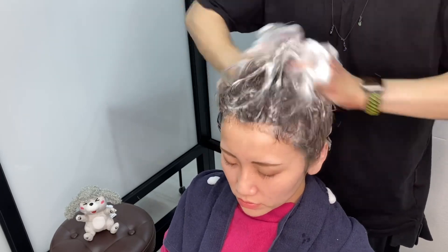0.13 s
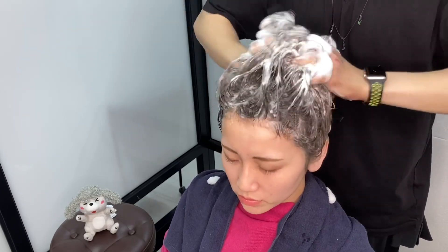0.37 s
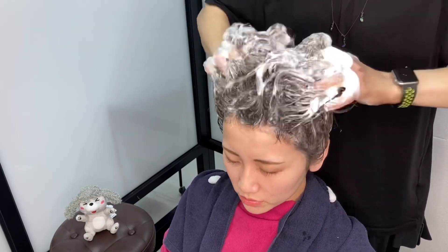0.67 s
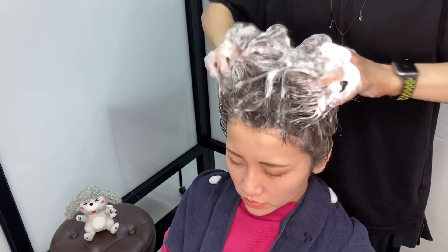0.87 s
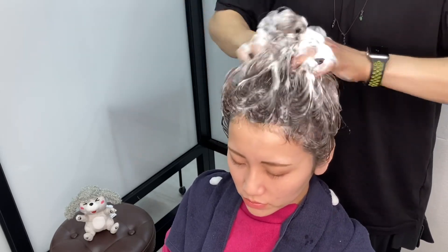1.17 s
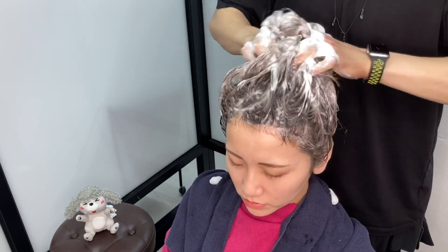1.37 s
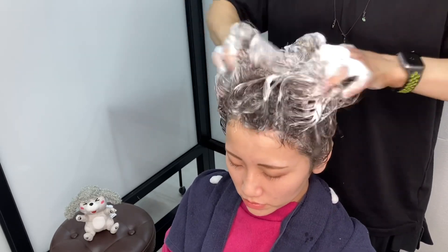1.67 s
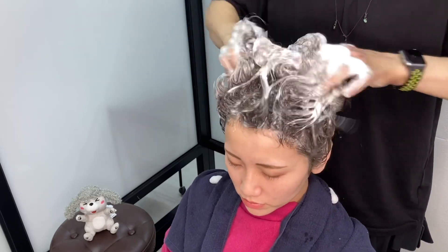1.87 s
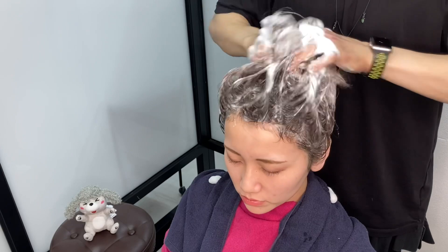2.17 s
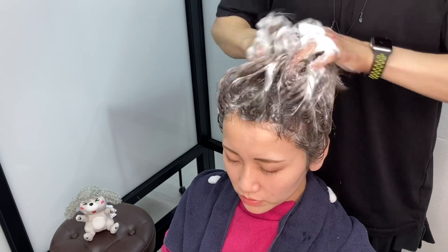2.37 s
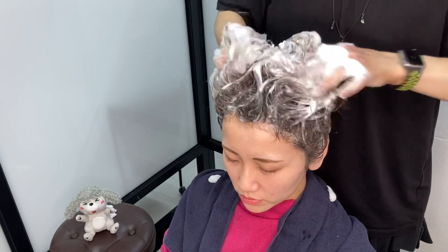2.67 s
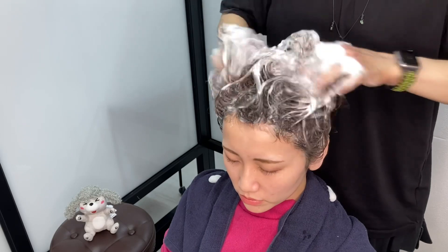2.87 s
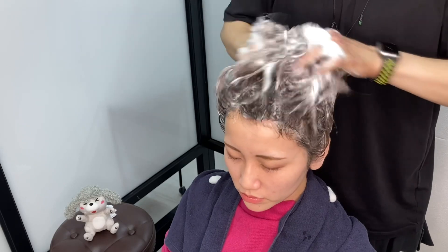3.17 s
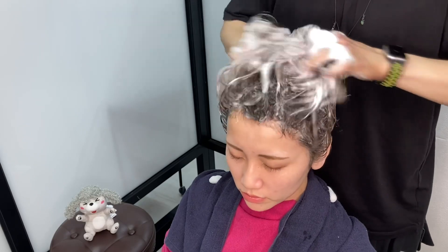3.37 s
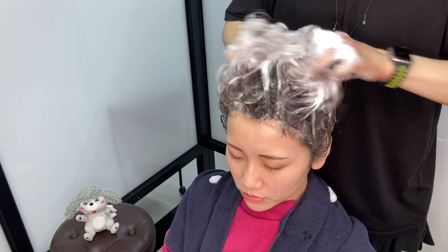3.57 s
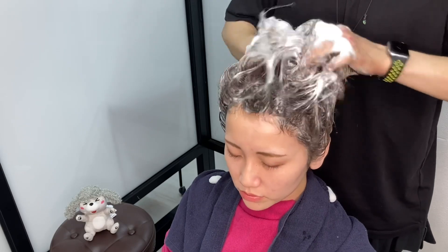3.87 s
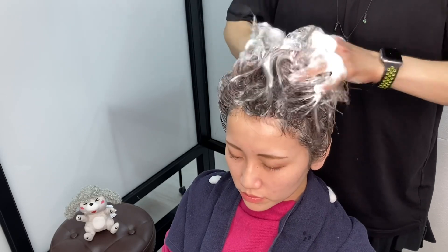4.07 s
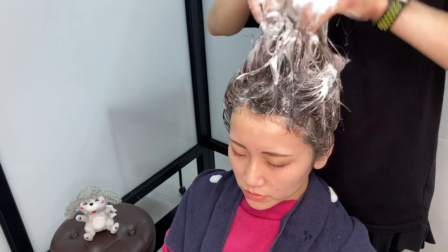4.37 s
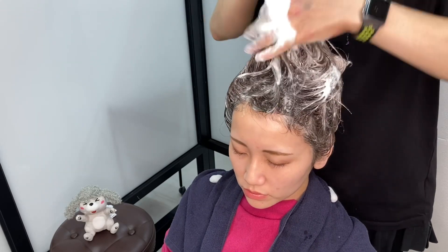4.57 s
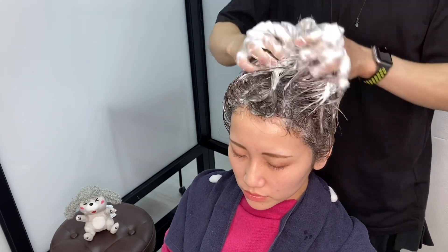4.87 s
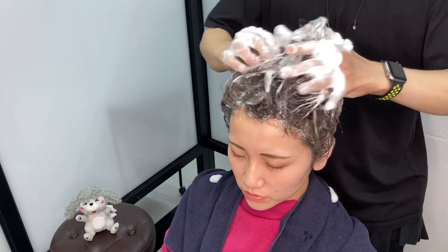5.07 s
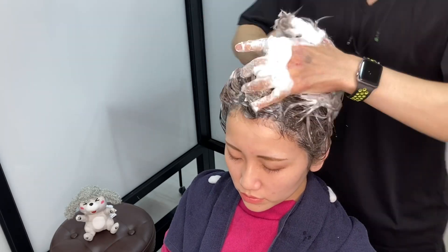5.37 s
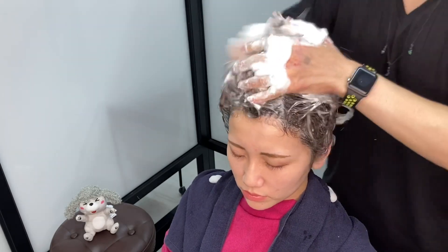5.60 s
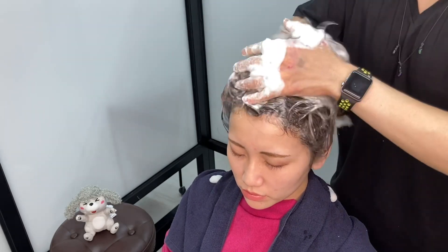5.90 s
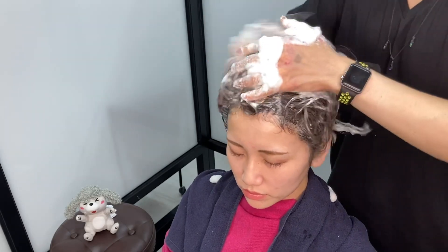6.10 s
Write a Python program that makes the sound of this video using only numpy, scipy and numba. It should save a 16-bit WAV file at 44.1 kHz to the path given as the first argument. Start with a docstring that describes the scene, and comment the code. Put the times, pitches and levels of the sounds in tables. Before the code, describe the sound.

Close, rapid wet scrubbing of foamy hair with crackling bubbles and squelches, a brief near-quiet gap, then gentler, rounder kneading in a small room.

```python
"""Fingers rub a thickly lathered scalp about ten times a second: wet slosh, squish and fine fizz from clouds of bubbles.
Air pockets squelch, foam spurts, wet skin pops and soap films snap along the way, all built from short dying sines.
After about four seconds the rubbing pauses as the hair is gathered; strands tick and palms knead a wetter patch.
Soon the hands scrub on more softly, and the foam turns rounder as a whole palm settles on it.
Filtered noise and a faint hum make the small salon's ventilation throughout; a phone close by takes it in."""
import sys
import numpy as np
from scipy import signal
from scipy.fft import rfft, irfft
from scipy.io import wavfile
from scipy.ndimage import uniform_filter1d
from numba import njit

SR = 44100
rng = np.random.default_rng(int(sys.argv[2]) if len(sys.argv) > 2 else 0)


def bounce(signal):
    """Save signal as a 16-bit WAV file at the path given by the first command-line argument."""
    frames = np.transpose(np.atleast_2d(signal))
    limited = np.clip(frames, -1, 1)
    pcm = np.round(limited * 32767).astype(np.int16)
    wavfile.write(sys.argv[1], SR, pcm)


N = 275184
TIME = np.arange(N) / SR  # seconds
FREQ = np.maximum(np.arange(N // 2 + 1) * SR / N, 1)  # Hz, kept above zero for logarithms


def undb(db):
    """Turn decibels into gain."""
    return 10 ** (np.asarray(db) / 20)


def unit(x):
    """Scale to an average strength (rms) of 1."""
    return x / np.sqrt(np.mean(x ** 2))


def colour(x, points):
    """Filter by (Hz, dB) points joined on a log-frequency axis."""
    hz, db = np.transpose(points)
    gain = undb(np.interp(np.log(FREQ), np.log(hz), db))
    return irfft(rfft(x) * gain, N)


def curve(table):
    """Join (time, level) points with straight lines, at every moment."""
    return np.interp(TIME, *np.transpose(table))


def walk(rate):
    """Wander smoothly at random, changing about rate times a second; spread 1."""
    spectrum = rfft(rng.standard_normal(N))
    return unit(irfft(spectrum * np.exp(-(FREQ / rate) ** 2), N))


@njit
def ring(start, hz, cycles, size, glide):
    """Each bubble is a dying sine whose pitch climbs; size (bubbles, 2) is the root of its energy left and right."""
    out = np.zeros((2, N))
    for k in range(len(start)):
        life = cycles[k] * SR / hz[k]  # samples
        first = int(start[k] * SR)
        phase = 0.
        strength = np.sqrt(12 / life)  # short and long bubbles get equal energy
        fade = np.exp(-3 / life)
        for i in range(max(first, 0), min(first + int(2 * life) + 2, N)):
            phase += 2 * np.pi * hz[k] / SR * (1 + glide * (i - first) / life)
            strength *= fade
            value = strength * np.sin(phase)
            out[0, i] += value * size[k, 0]
            out[1, i] += value * size[k, 1]
    return out


def bubbles(start, hz, cycles, size, glide, spread=1.0):
    """Bubbles burst or form (either sign), scattered left and right over the head."""
    sign = rng.choice([-1, 1], len(start))
    side = rng.uniform(-1, 1, len(start))
    balance = 1 + spread * np.outer(side, [1, -1])
    sizes = (sign * size)[:, None] * balance
    return ring(start, np.minimum(hz, .4 * SR), np.maximum(cycles, .5), sizes, float(glide))


def scrubbing(slosh_db=-5.5, fizz_db=0.58, ticks_db=-6):
    """Each rub stirs three sizes of bubble above their simmer; the larger ones come in clumps as the hair slips."""
    place, crest, rub_squish_db, rub_fizz_db, gap_hz = current_rub()
    calm_squish, calm_fizz, calm_slosh = undb(simmer())

    # the gap's resonance glides down 0.15 octaves over one rub
    gliding_gap_hz = gap_hz * 2 ** (-0.15 * (place - .5))
    slosh = cloud(low_hz=349, high_hz=1310, cycles=3.9, scatter_db=1.76, glide=0.05,
                  gap_db=3, gap_hz=gap_hz / 2.23, wander_octaves=0.48, count=8000)
    squish = cloud(low_hz=1286, high_hz=3245, cycles=7.1, scatter_db=0.0, glide=0.085,
                   gap_db=3.5, gap_hz=gliding_gap_hz, wander_octaves=0.18, count=9000, gap_octaves=0.26)
    fizz = cloud(low_hz=3100, high_hz=14940, cycles=3.15, scatter_db=0.0, glide=0.0085,
                 gap_db=6.0, gap_hz=6760, wander_octaves=0.52, count=70000)
    # sticky strands tear through the squish with short, sparse ticks
    ticks = cloud(low_hz=900, high_hz=4460, cycles=1.55, scatter_db=2.5, glide=0.03,
                  gap_db=5.0, gap_hz=gap_hz, wander_octaves=0.4, count=1100)
    squish = unit(squish + undb(ticks_db) * ticks)

    slosh_rub = finger_speed(place, crest, grip=0.81, ease=2.0) * undb(rub_squish_db + slosh_db)
    squish_rub = finger_speed(place, crest, grip=1.0, ease=2.8) * undb(rub_squish_db)
    fizz_rub = finger_speed(place, crest=0.37, grip=0.58, ease=1.11) * undb(rub_fizz_db + fizz_db)
    # the energy of the rub adds to that of the simmer
    slosh = slosh * np.hypot(calm_slosh, slosh_rub)
    squish = squish * np.hypot(calm_squish, squish_rub)
    fizz = fizz * np.hypot(calm_fizz, fizz_rub)

    clumps = slips(depth=0.39, decay_s=0.0071, count=380)
    # the wet middle of the sound leans to the left
    wet = slosh + squish * undb([[1.1], [-1.1]])
    return clumps * wet + clumps ** 0.11 * fizz


# rubs of the fingers: start_s, crest (share of the rub, 0-1), squish_db and fizz_db (relative levels),
# gap_hz (resonance of the gap under the fingers)
RUBS = [(-0.001, 0.4, -55.5, -51.5, 2210), (0.109, 0.5, -52.5, -49.5, 2640), (0.199, 0.25, -53, -53, 1820),
        (0.309, 0.37, -58.5, -51.5, 2890), (0.404, 0.4, -58.5, -54, 2320), (0.509, 0.46, -54, -51, 2440),
        (0.603, 0.4, -54.5, -49.5, 2720), (0.701, 0.55, -55, -53.0, 2540),
        (0.805, 0.33, -52.5, -51.5, 2300), (0.909, 0.5, -55, -54.5, 2390), (1.002, 0.05, -51, -52, 1870),
        (1.107, 0.7, -53, -52.5, 2280), (1.196, 0.3, -54.5, -51.5, 2330), (1.299, 0.47, -54.5, -52.5, 2120),
        (1.404, 0.1, -52, -50.5, 1770), (1.498, 0.4, -53.5, -51.5, 2750), (1.597, 0.3, -52, -50.5, 2120),
        (1.694, 0.5, -51.5, -51, 1800), (1.789, 0.23, -51.5, -52, 1800), (1.888, 0.75, -55, -52.5, 2400),
        (1.992, 0, -52.5, -49, 2270), (2.089, 0.85, -56, -51.5, 2150), (2.191, 0.2, -50, -50.5, 1760),
        (2.297, 0.5, -55, -52, 2230), (2.394, 0.07, -51, -49.5, 2100), (2.499, 0.72, -53.5, -51.5, 1450),
        (2.594, 0.1, -53.5, -49.0, 1930), (2.69, 0.76, -54.5, -49, 2400), (2.787, 0.1, -53, -49.5, 2220),
        (2.891, 0.6, -60, -50.5, 2110), (2.98, 0.15, -52, -51, 2010), (3.083, 0.29, -58.5, -49, 2930),
        (3.167, 0.1, -50.5, -51.5, 2000), (3.27, 1, -59, -49.5, 2100), (3.354, 0.1, -52.5, -50.5, 2230),
        (3.461, 0.23, -55, -50, 1960), (3.543, 0.16, -52.5, -51.5, 1790), (3.644, 0.76, -58, -53, 1630),
        (3.721, 0.6, -60, -54, 2230), (3.823, 0.3, -60, -56.5, 1950), (3.919, 0.6, -60.5, -56, 2700),
        (4.003, 0.4, -60, -56, 1620), (4.108, 0.1, -65, -65.5, 2170), (4.315, 0.4, -65.5, -72, 2180),
        (4.759, 0.2, -71, -61.5, 2210), (4.856, 0.3, -61, -77, 2200), (4.926, 0.9, -61, -64.5, 1630),
        (5.024, 0.3, -59, -61, 2740), (5.124, 0.3, -59, -65, 1700), (5.207, 0.43, -56.5, -60, 2150),
        (5.322, 0.28, -57.5, -60.0, 2530), (5.402, 0.2, -58, -55.5, 1870), (5.493, 0.4, -58, -57.5, 2270),
        (5.578, 0.25, -57, -58, 1900), (5.668, 0.35, -59, -55.5, 2240), (5.753, 0.35, -58, -58, 2130),
        (5.832, 0.55, -57, -59.5, 1660), (5.925, 0.15, -54.5, -61, 1740), (5.995, 0.4, -57, -62.5, 1990),
        (6.084, 0.35, -55.5, -55.5, 2010), (6.154, 0.45, -58, -57.5, 2220)]


def current_rub(longest_s=0.111):
    """Place within the current rub (0-1) and that rub's crest, levels and resonance at every moment."""
    start, *columns = np.transpose(RUBS)
    length = np.minimum(np.diff(start, append=np.inf), longest_s)
    rub = np.maximum(np.searchsorted(start, TIME) - 1, 0)
    place = np.clip((TIME - start[rub]) / length[rub], 0, 1)
    return [place] + [column[rub] for column in columns]


def finger_speed(place, crest, grip, ease):
    """In each rub the fingers break loose, reach a crest of 1 and ease off to a stall."""
    top = np.clip(crest, .1, .9)  # leaves time to rise and to fall
    turn = np.minimum(place / top, (1 - place) / (1 - top)) * np.pi / 2
    return np.sin(turn) ** np.where(place < top, grip, ease)


# foam that keeps working between the rubs, fainter as the hair is gathered, then a wetter patch:
# time_s, squish_db, fizz_db, slosh_db (relative levels)
FOAM_SIMMER = [(0, -64, -57.5, -61), (.6, -63, -59.5, -63.5), (1.0, -56.5, -57, -67),
               (1.35, -64.5, -59.5, -64), (2, -61.5, -63, -60), (3.4, -63, -68, -61.5),
               (4.05, -66.5, -62, -63), (4.2, -66.5, -66, -64), (4.43, -67.5, -64.5, -61.5),
               (4.52, -66.5, -71.5, -61), (4.66, -69, -65, -66), (4.745, -76, -72, -67),
               (4.8, -63, -69, -69), (4.98, -68, -65, -58.5), (5.2, -66, -65.5, -62.5),
               (5.5, -64, -70.5, -57), (5.85, -60, -59.5, -62), (6.24, -63.5, -64, -61)]


def simmer():
    """Foam works on by itself: levels of squish, fizz and slosh between the rubs, at every moment."""
    s, *columns = np.transpose(FOAM_SIMMER)
    return [np.interp(TIME, s, column) for column in columns]


def slips(depth, decay_s, count):
    """Wet strands catch and let go: each slip lifts the bubbles at once, then dies away; rms 1."""
    when, chance = rng.random((count, 2)).T
    kicks = np.bincount((when * N).astype(int), chance ** 2, N)
    dying = signal.lfilter([1], [1, -np.exp(-1 / (decay_s * SR))], kicks)
    return unit(1 + depth * dying)


# colour of the bursting foam: pitch_hz, gain_db
LATHER_COLOUR = [(150, -34), (350, 3), (570, 7), (720, 4), (950, 3.5), (1300, 2), (1600, 1.5), (2400, 3),
                 (3200, 0.5), (4300, 2), (5500, -4.5), (7000, 0.5), (8800, 1.5), (10500, 1.5), (13000, -4),
                 (15800, -9.5)]


def cloud(low_hz, high_hz, cycles, scatter_db, glide, gap_db, gap_hz, wander_octaves, count, gap_octaves=0.53):
    """Many bubbles of one size class pop at random, favoured near the resonance of a changing gap; rms 1."""
    when, pitch, life, chance = rng.random((count, 4)).T
    hz = low_hz + pitch * (high_hz - low_hz)
    # above zero, scatter makes a few bubbles stand out; below zero, a few are fainter; zero means all alike
    size = undb(scatter_db * np.minimum(-np.log(1 - chance), 5))
    # the gap under the fingers keeps changing shape
    wandering_hz = gap_hz * 2 ** (wander_octaves * walk(16.7))
    favoured = wandering_hz[(when * N).astype(int)]
    octaves_off = np.log2(hz / favoured)
    size = size * undb(gap_db * np.exp(-(octaves_off / gap_octaves) ** 2))
    pops = bubbles(when * N / SR, hz, cycles * 2 ** (2 * life - 1), size, glide)
    return unit(colour(pops, LATHER_COLOUR))


# how a flat palm colours the foam beneath it: pitch_hz, gain_db
PALM_COLOUR = [(1000, 0.5), (1550, 2), (2400, -0.5), (3300, -1), (6000, -1), (10000, 0)]
# from fingertips only to the whole hand: start_s, end_s
PALM_SETTLES_S = (4.7, 5.4)


def under_palm(x):
    """Once the hand lies flat on the head the foam sounds rounder and duller."""
    cover = np.interp(TIME, PALM_SETTLES_S, (0, 1))
    return (1 - cover) * x + cover * colour(x, PALM_COLOUR)


# palms kneading the wetter patch: time_s, level_db (before a slight wander)
KNEADING_SWELL = [(4.2, -73), (4.7, -65), (5.0, -60.5), (5.55, -65.5), (6.24, -55.5)]


def kneading():
    """Flat hands squash big, low bubbles out of the soaked hair."""
    big = cloud(low_hz=282, high_hz=737, cycles=5.5, scatter_db=-1.5, glide=0.058,
                gap_db=6, gap_hz=640, wander_octaves=.2, count=3000)
    return big * undb(curve(KNEADING_SWELL) + 0.43 * walk(10))


# air pockets squeezed out of the lather: time_s, pitch_hz (middle of the cluster), length_s, level_db (relative)
AIR_POCKETS = [(.137, 2330, 0.017, -50), (.224, 720, 0.018, -64), (.346, 2110, 0.014, -56),
               (.561, 840, 0.014, -55), (1.158, 2140, 0.016, -50), (1.417, 960, 0.012, -48.5),
               (1.421, 1780, 0.0088, -57), (1.571, 2200, 0.0051, -50), (1.8, 1050, 0.014, -56),
               (2.011, 2420, 0.011, -51), (2.441, 524, 0.0137, -44), (2.459, 495, 0.012, -44),
               (2.562, 1210, 0.0093, -52), (2.615, 2040, 0.017, -52), (2.81, 2220, 0.018, -52),
               (3.395, 2210, 0.019, -55), (3.55, 1930, 0.0058, -52), (3.741, 2300, 0.014, -54),
               (4.818, 2130, 0.012, -55.5), (5.42, 1210, 0.011, -55), (5.52, 830, .02, -52),
               (5.872, 910, 0.014, -47), (6.175, 645, 0.016, -51)]


def squelching():
    """Each squeezed air pocket breaks into a cluster of ringing bubbles."""
    return bursts(AIR_POCKETS, cycles=13.5, octaves=0.23, gain_db=-2.0, count=40)


# foam spurting between the fingers: time_s, pitch_hz (middle of the cluster), length_s, level_db (relative)
FOAM_SPURTS = [(.141, 6000, 0.015, -38), (.351, 5800, 0.0058, -32), (2.92, 6800, 0.011, -40),
               (3.108, 8050, 0.021, -40), (3.292, 7040, .017, -39.5), (3.667, 8100, 0.01, -40.5),
               (3.961, 7000, 0.016, -41)]


def spurting():
    """Foam forced between the fingers breaks into a hissing cluster of very short, high bubbles."""
    return bursts(FOAM_SPURTS, cycles=1.0, octaves=0.49, gain_db=-11.0, count=60)


def bursts(table, cycles, octaves, gain_db, count):
    """Each row sets off a cluster of bubbles of about one size; it starts abruptly and trails off."""
    s, hz, length, db = np.repeat(np.array(table), count, axis=0).T
    late, pitch = rng.standard_normal((len(s), 2)).T
    start = s + np.maximum(late, -1) * length / np.pi
    # the cluster's energy is shared out among its bubbles
    size = undb(db + gain_db) * np.sqrt(length * SR / count)
    return bubbles(start, hz * 2 ** (octaves * pitch), np.full(len(s), cycles), size, 0.058)


# short wet pops of skin, and faint ticks of hair strands while the rubbing pauses:
# time_s, pitch_hz (at the start), level_db (root of energy)
POPS_AND_TICKS = [(.1375, 2600, -31), (1.408, 2400, -33), (1.7386, 1750, -25), (2.0055, 2310, -22),
                  (2.5592, 1600, -28), (2.5607, 1190, -31), (2.915, 3800, -36), (3.396, 2300, -30),
                  (3.5472, 3000, -35), (3.735, 2200, -25), (4.094, 3000, -37), (4.177, 2200, -42),
                  (4.637, 1800, -39), (4.772, 2700, -41), (5.8643, 1120, -24)]


def popping_and_ticking(cycles=3.2):
    """Suction under a finger breaks with a short, wet pop; hair strands tick faintly; each is one dying sine."""
    s, hz, db = np.transpose(POPS_AND_TICKS)
    return bubbles(s, hz, np.full(len(s), cycles), undb(db), .06, spread=0.15)


# single soap films snapping: time_s, pitch_hz (at the start), level_db (root of energy)
FILM_SNAPS = [(0.144, 6500, -32), (0.355, 5500, -31), (1.892, 10000, -27), (1.904, 10000, -33),
              (2.082, 7100, -32), (3.3637, 10500, -26), (4.096, 7000, -51), (4.178, 7000, -42),
              (4.356, 7000, -39), (5.0741, 10200, -22.5)]


def snapping(cycles=9.7, small_db=-44, count=90):
    """Large films snap one by one; many smaller ones go off at random, louder where the fizz simmers more."""
    s, hz, db = np.transpose(FILM_SNAPS)
    large = bubbles(s, hz, np.full(len(s), cycles), undb(db), .02, spread=0.073)
    when, pitch = rng.random((count, 2)).T
    _, calm_fizz_db, _ = simmer()
    effort = unit(undb(calm_fizz_db))[(when * N).astype(int)]
    size = np.sqrt(effort) * undb(small_db)
    small = bubbles(when * N / SR, 4500 + 7000 * pitch, np.full(count, cycles / 2), size, .02)
    return large + small


def salon(x, wet_db=-4, treble_db=-10, early_db=9, early_t60_s=0.026, tail_t60_s=0.31, shift_rate=7, count=8):
    """Glass walls close by give quick reflections and a short tail, different on each side; they shift at random."""
    t = TIME[:SR // 3]
    # T60 is the time to die away by 60 dB
    fade = undb(-60 * t / tail_t60_s) + undb(early_db - 60 * t / early_t60_s)
    tails = rng.standard_normal((count, 2, len(t))) * fade * (t > .002)
    tails /= np.linalg.norm(tails, axis=2, keepdims=True)
    # each place of the moving hands has its own set of reflections
    places = np.array([walk(shift_rate) for _ in range(count)])
    places /= np.linalg.norm(places, axis=0)
    wet = 0
    for place, tail in zip(places, tails):
        wet = wet + signal.oaconvolve(x * place, tail, axes=1)[:, :N]
    both = x + colour(wet, [(1500, wet_db), (8000, treble_db)])
    return both * undb([[0.32], [-0.32]])  # slightly louder on the left


# rumble of the ventilation, shaping noise: pitch_hz, gain_db
RUMBLE_COLOUR = [(15, -52), (25, -23), (36, -15), (46, 0), (55, 0), (66, -3.5), (79, -12.5), (90, -21),
                 (112, -40), (300, -89)]
# uneven level of the low rumble, wandering irregularly: time_s, level_db (before a slight waver)
RUMBLE_LEVEL = [(0.0, -39), (0.3, -37), (0.48, -33.5), (0.65, -37), (1.02, -38), (1.51, -32), (1.75, -38),
                (2.27, -34), (2.57, -39), (2.97, -32.5), (3.6, -40), (4.1, -38.5), (4.57, -32.5),
                (5.03, -39.0), (5.4, -35), (6.23, -41)]
# drone of the air ducts, shaping noise: pitch_hz, gain_db
DRONE_COLOUR = [(40, -28), (62, -16.5), (76, 1.5), (86, -6), (97, -3), (110, -19), (160, -32), (300, -72)]
# uneven level of the drone: time_s, level_db
DRONE_LEVEL = [(0, -42.5), (1.2, -45.5), (2.2, -40.5), (2.8, -46.5), (3.05, -50.5), (3.8, -41.5),
               (4.6, -46), (5.6, -39.5), (6.24, -47.5)]
# rush of air in the salon, shaping noise: pitch_hz, gain_db
AIR_COLOUR = [(60, 3), (140, 1.5), (185, -2), (230, 3), (265, -1), (296, 6.5), (325, -3), (358, 3.5),
              (420, -7.5), (480, -6), (700, -20.5), (1300, -21), (3000, -31), (8000, -35), (12000, -46),
              (16000, -64)]


def ventilation(air_db=-50.5, hum_hz=121, hum_db=-63.5):
    """An uneven low rumble and drone and a faint hum, nearly alike on both sides, under a diffuse rush of air."""
    rumble = colour(rng.standard_normal(N), RUMBLE_COLOUR)
    rumble /= np.sqrt(uniform_filter1d(rumble ** 2, size=8000))  # even out its own ups and downs
    rumble = rumble * undb(curve(RUMBLE_LEVEL) + 0.5 * walk(7.0))
    drone = undb(curve(DRONE_LEVEL)) * unit(colour(rng.standard_normal(N), DRONE_COLOUR))
    # mains hum of the fan motor
    hum = undb(hum_db) * unit(np.sin(2 * np.pi * hum_hz * TIME))
    # air shared by both sides, and air opposite in sign on the two sides
    mid = unit(colour(rng.standard_normal(N), AIR_COLOUR))
    side = unit(colour(rng.standard_normal(N), AIR_COLOUR))
    side = colour(side, [(100, -4.0), (330, -10.0), (600, 3.0)])
    air = undb(air_db) * (mid + side * np.array([[1], [-1]]))
    return (rumble + drone + hum) * undb([[-.45], [.45]]) + air


def scene():
    """Foam in the room, over the ventilation."""
    foam = under_palm(scrubbing()) + kneading()
    foam = foam + squelching() + spurting() + popping_and_ticking() + snapping()
    return salon(foam) + ventilation()


def record(dry, shared_hz=6000, lag_s=.000219, top_hz=15800):
    """The phone feeds the treble of one microphone to both sides, inverted and late on the left, and cuts the top."""
    left, right = rfft(dry)
    share = 1 / (1 + (shared_hz / FREQ) ** 24)  # 0 in the bass, 1 in the treble
    late = -right * np.exp(-2j * np.pi * FREQ * lag_s)
    left = np.sqrt(1 - share) * left + np.sqrt(share) * late
    low_pass = signal.ellip(10, .2, 70, top_hz, fs=SR, output="sos")
    return signal.sosfilt(low_pass, irfft(np.array([left, right]), N))


dry = scene()
out = record(dry)
bounce(out)
```